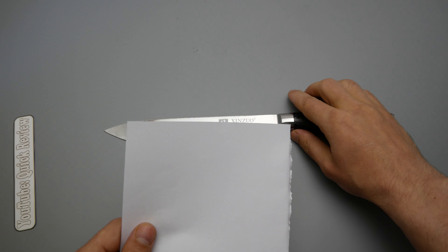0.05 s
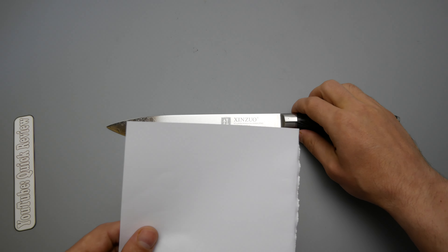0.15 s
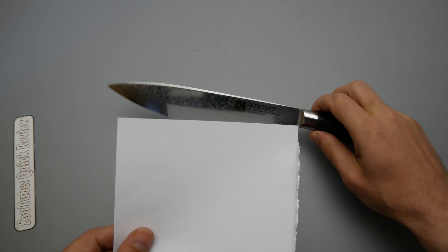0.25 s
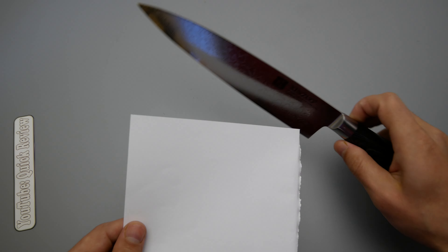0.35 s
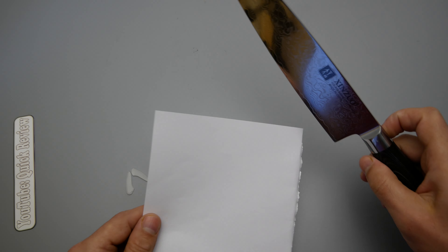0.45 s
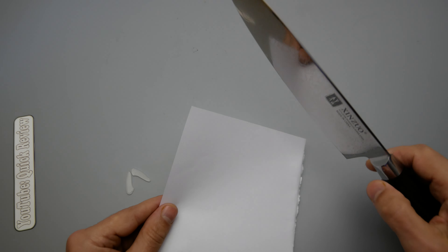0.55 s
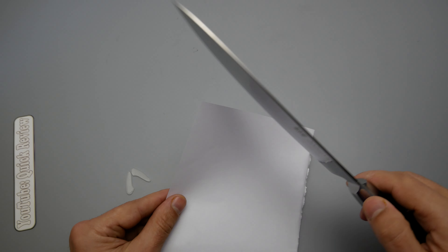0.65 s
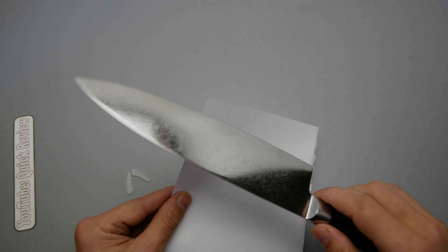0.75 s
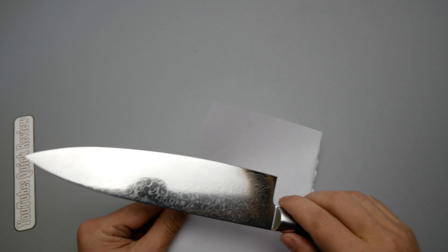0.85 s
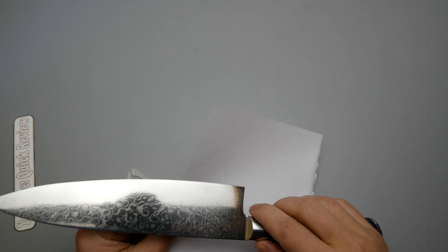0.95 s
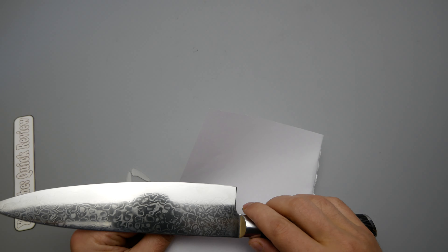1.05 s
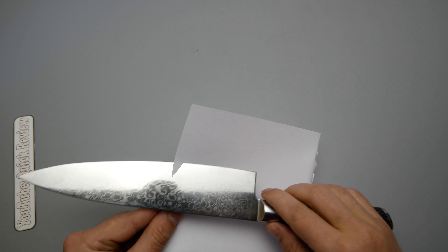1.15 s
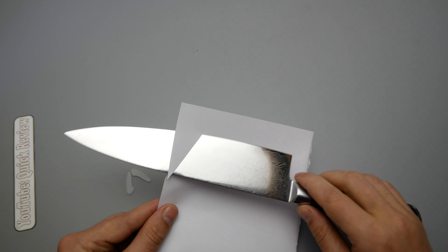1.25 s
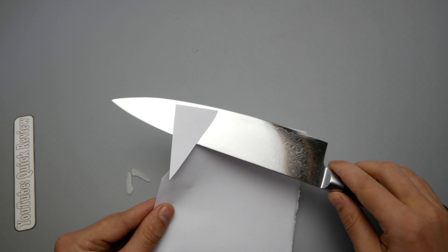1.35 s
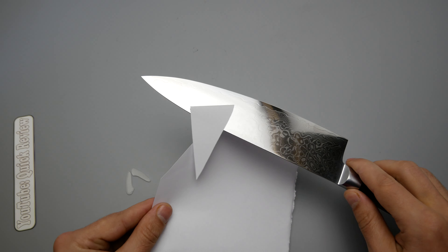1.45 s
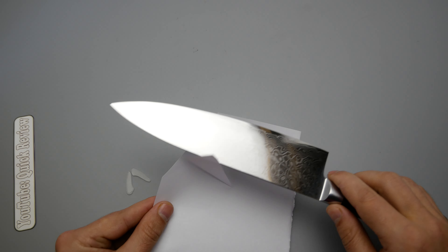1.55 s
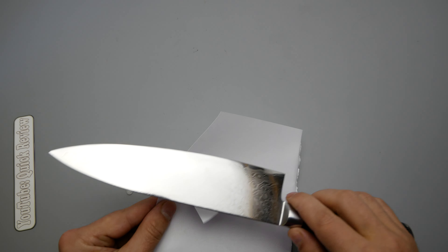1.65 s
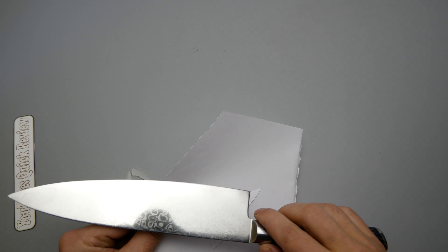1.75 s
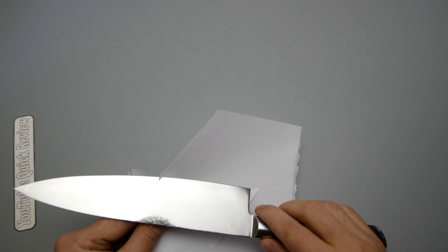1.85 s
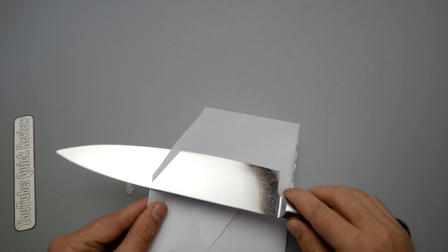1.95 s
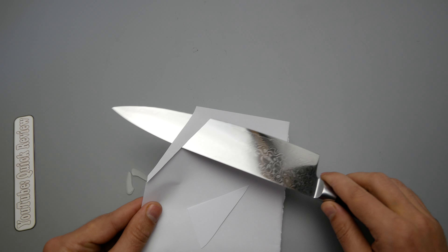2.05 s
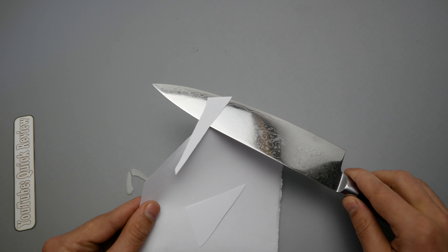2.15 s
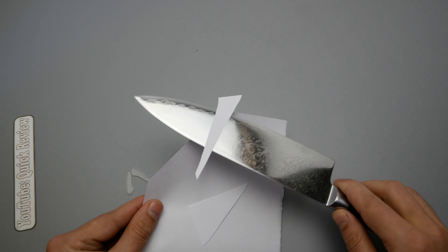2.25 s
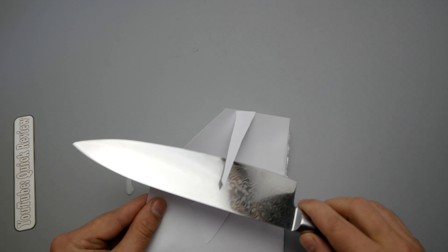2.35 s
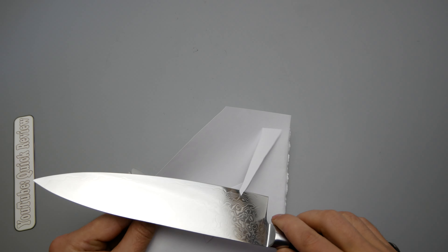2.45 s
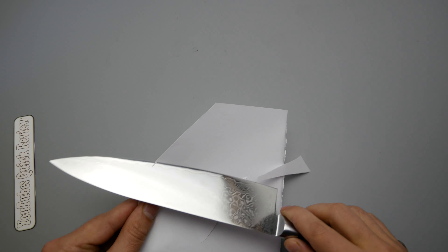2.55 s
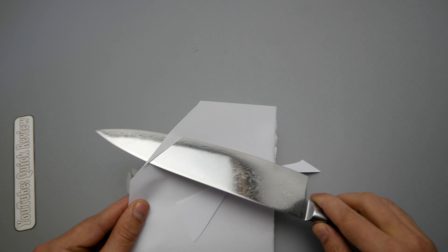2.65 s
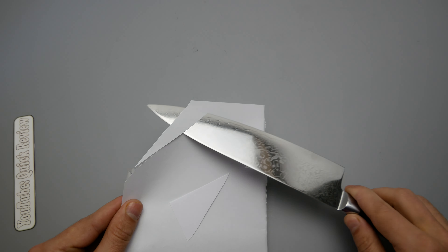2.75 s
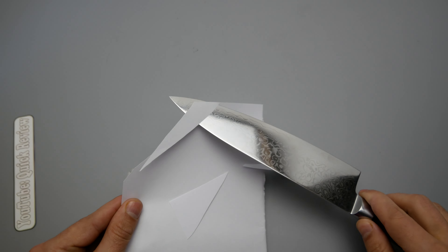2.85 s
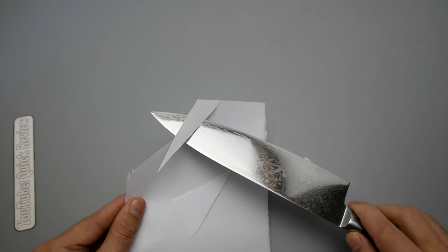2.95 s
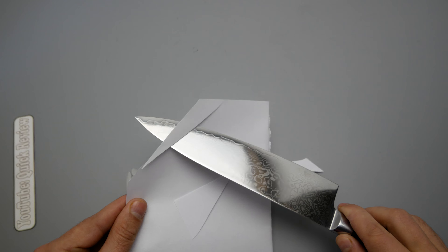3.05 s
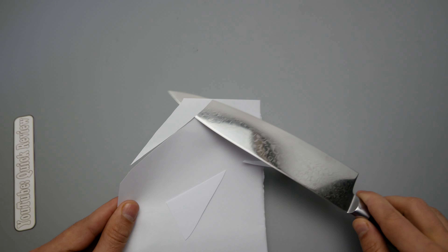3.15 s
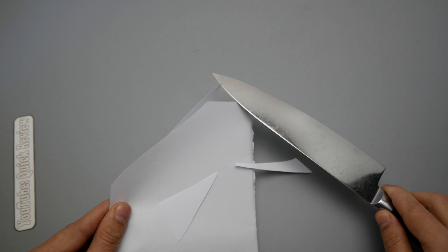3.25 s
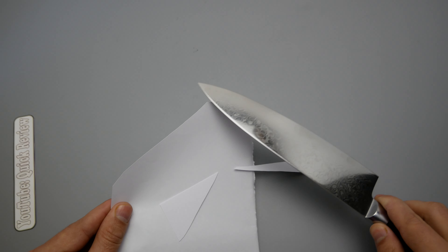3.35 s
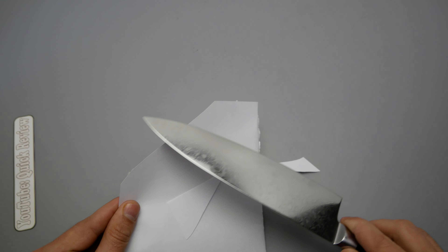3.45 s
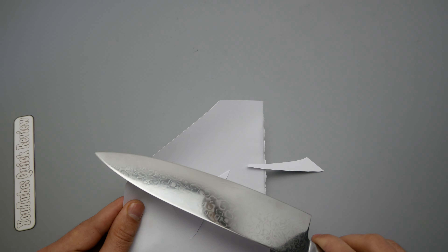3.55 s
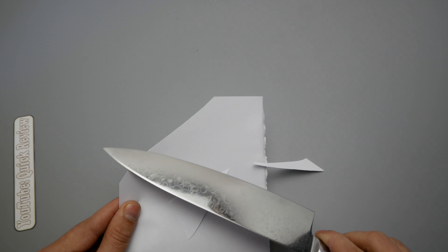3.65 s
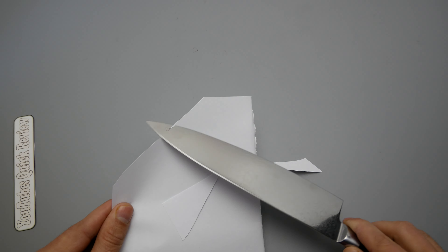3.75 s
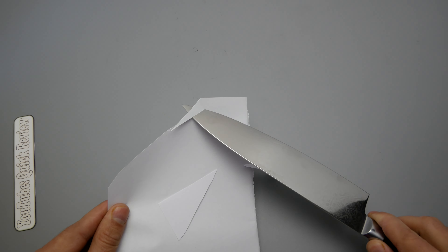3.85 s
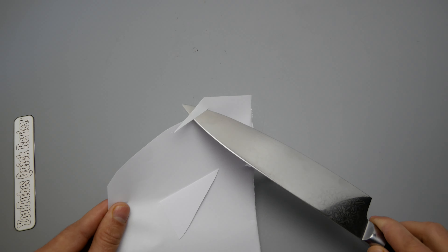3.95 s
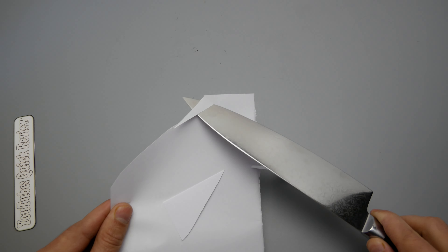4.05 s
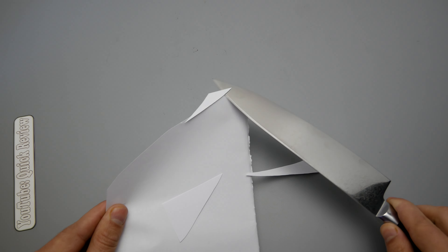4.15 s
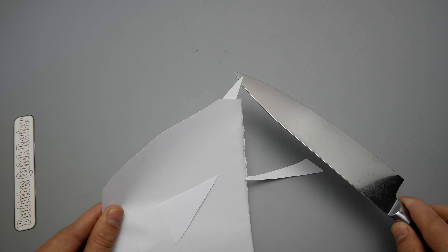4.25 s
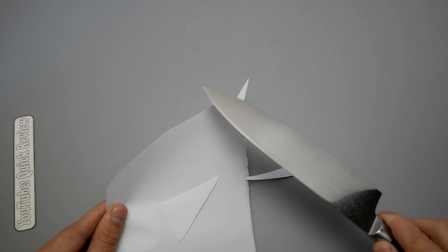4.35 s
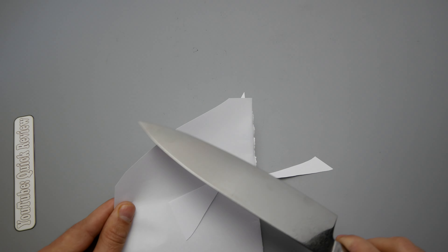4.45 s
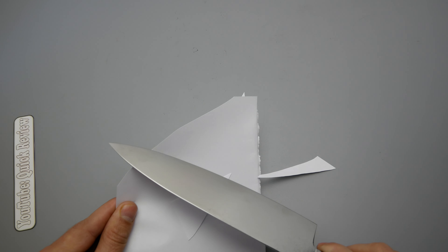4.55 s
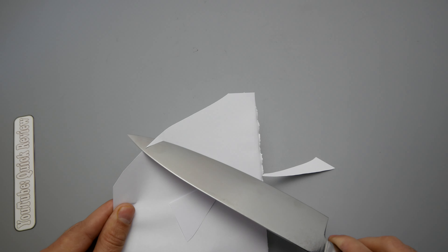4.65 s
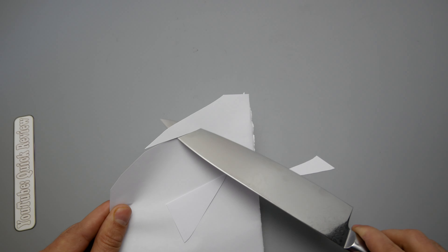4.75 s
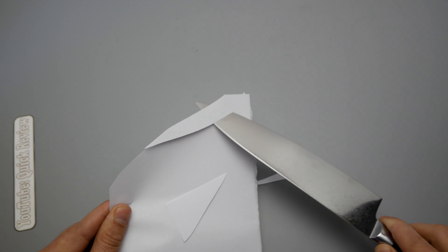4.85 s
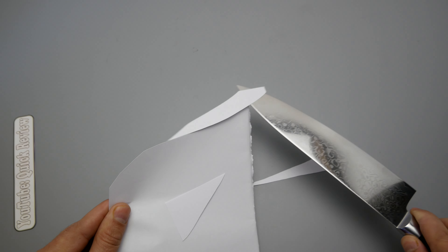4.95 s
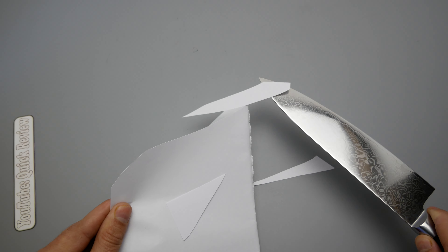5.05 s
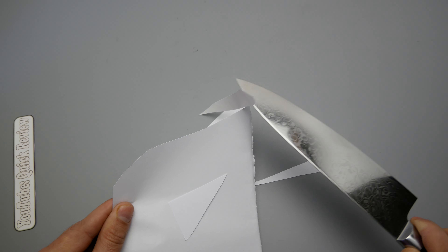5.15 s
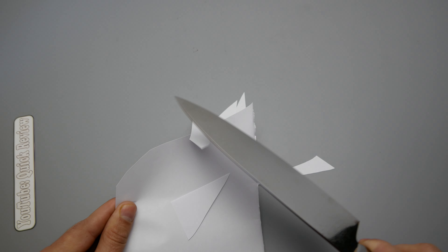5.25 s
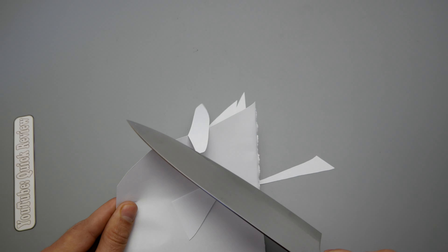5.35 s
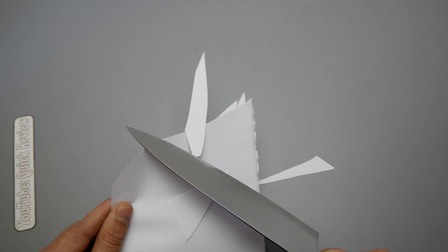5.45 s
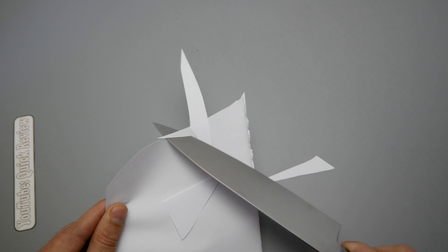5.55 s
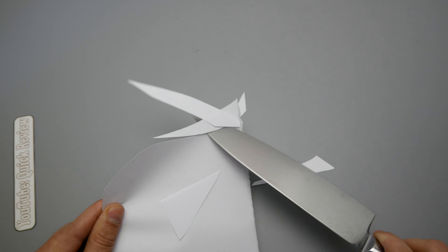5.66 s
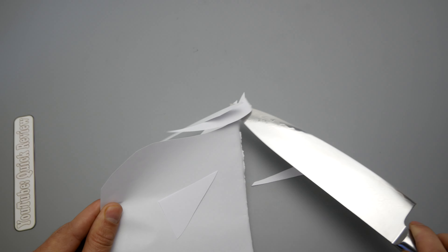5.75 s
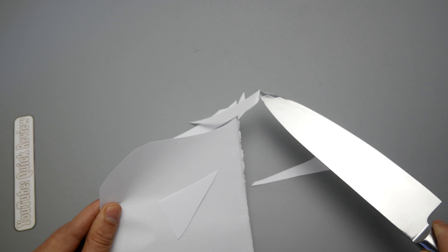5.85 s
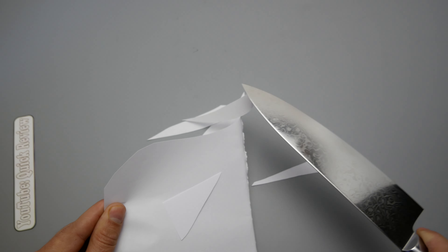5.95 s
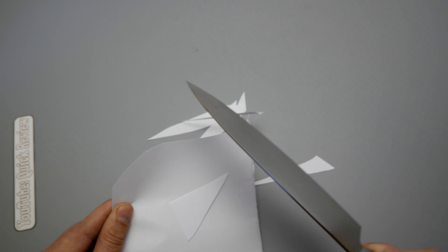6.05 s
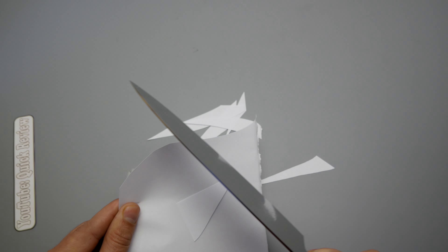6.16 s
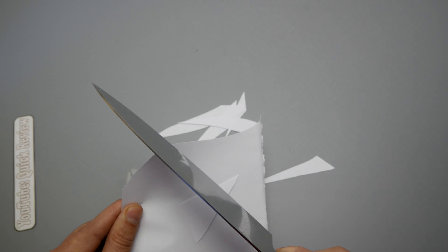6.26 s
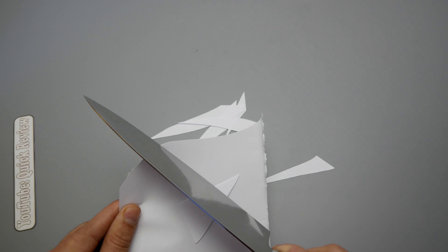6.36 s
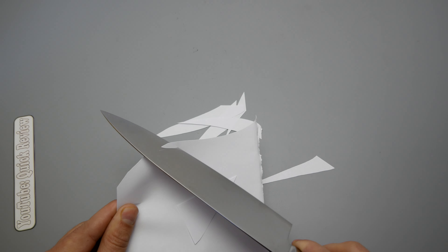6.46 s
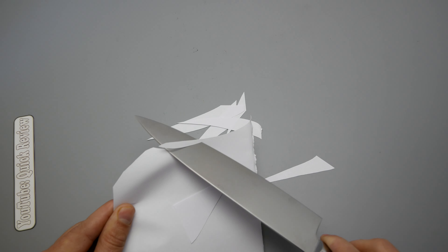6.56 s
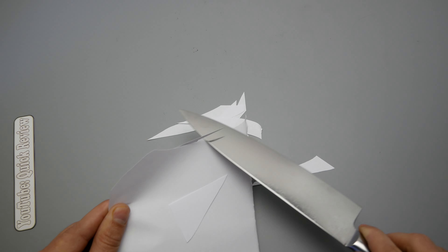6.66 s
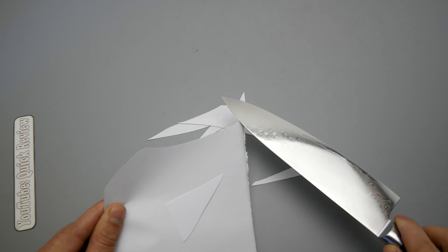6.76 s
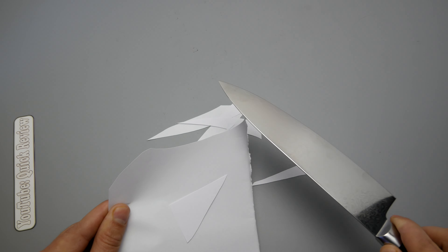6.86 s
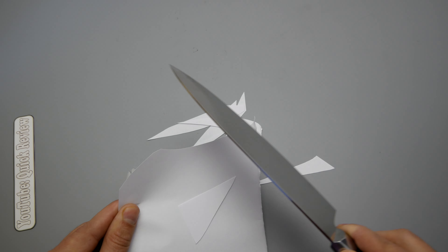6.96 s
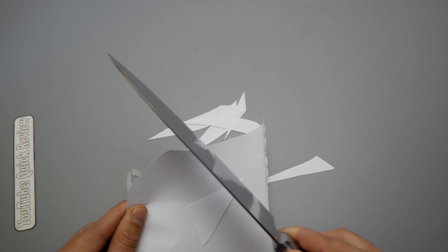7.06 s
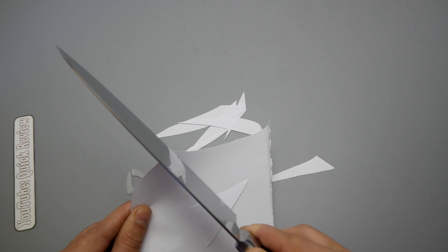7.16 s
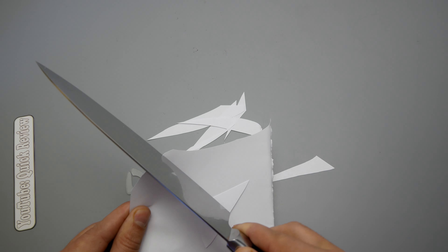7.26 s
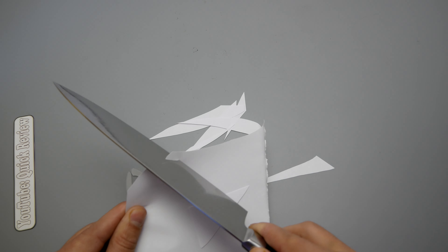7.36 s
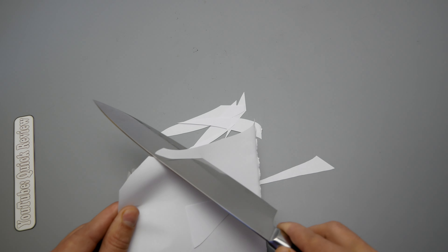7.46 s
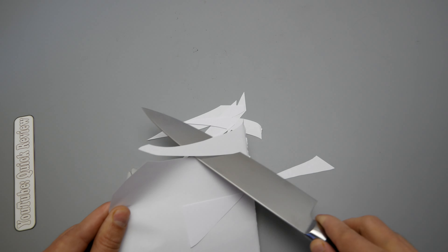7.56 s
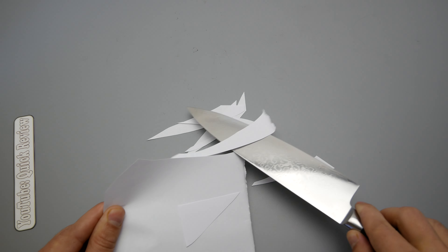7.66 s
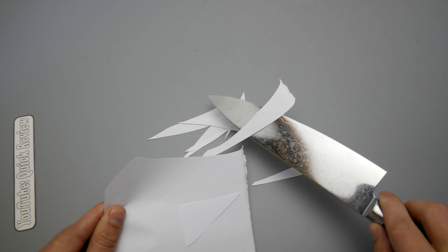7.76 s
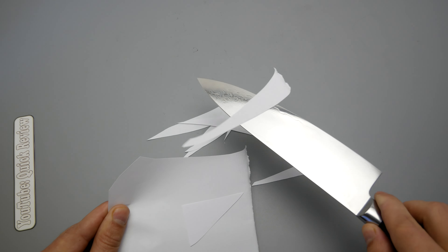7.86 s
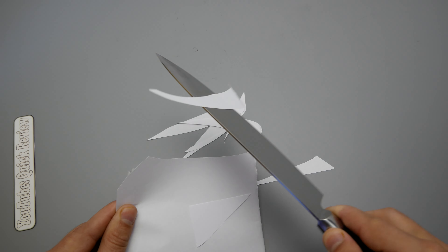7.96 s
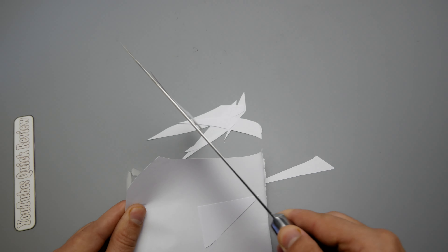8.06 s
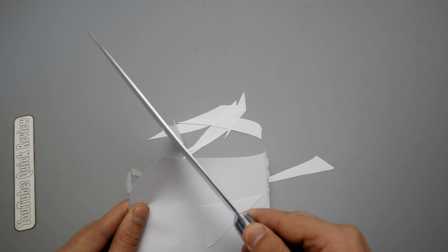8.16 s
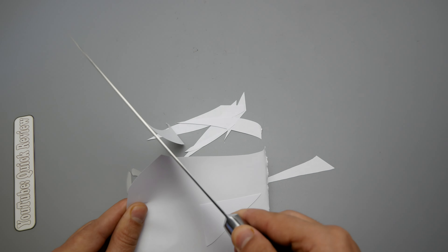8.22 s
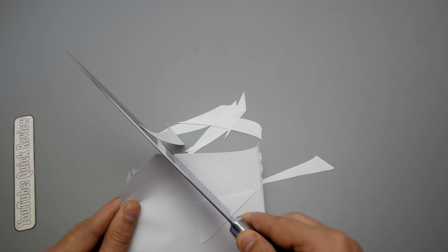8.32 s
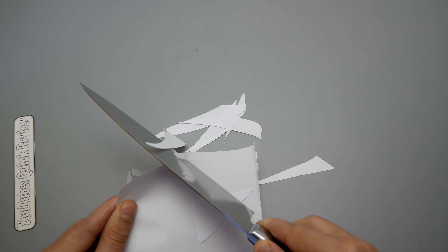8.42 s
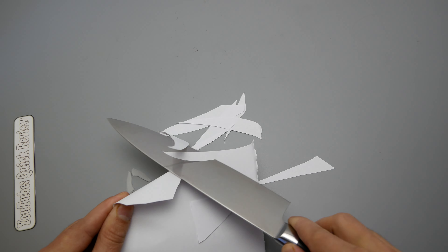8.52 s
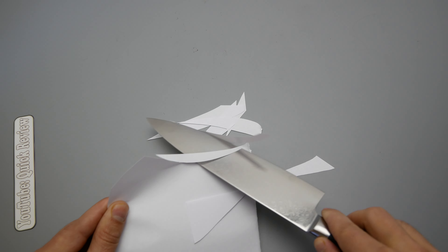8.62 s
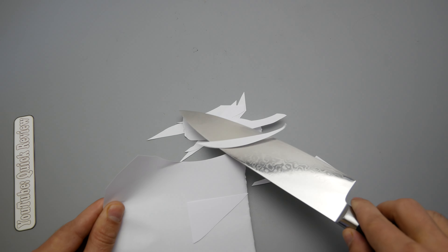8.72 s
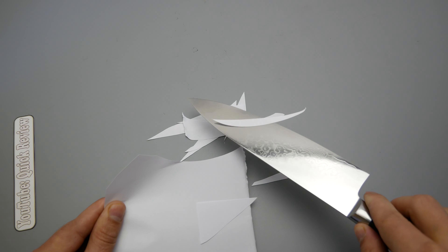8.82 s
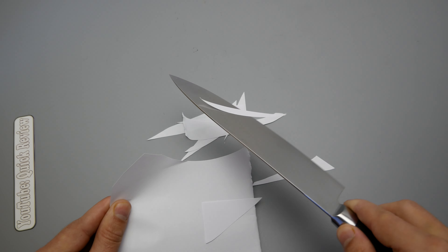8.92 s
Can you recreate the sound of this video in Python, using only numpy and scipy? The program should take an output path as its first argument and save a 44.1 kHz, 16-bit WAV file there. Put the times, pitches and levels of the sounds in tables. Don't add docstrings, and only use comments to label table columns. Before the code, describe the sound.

Close up in a small quiet room, a sheet of paper slides softly through fingers and flicks once, then a sharp knife makes ten separate cuts. Each is a short, gritty, bright tearing swish, followed by rustles, flicks and dull taps of the shaken sheet. The blade sometimes sings very faintly afterward. The last cut is longest and bites hardest. A low motor hum and soft room noise stay underneath.

```python
import sys
import numpy as np
from scipy import signal
from scipy.fft import rfft, irfft, next_fast_len
from scipy.io import wavfile
from scipy.ndimage import uniform_filter1d

SR = 44100
rng = np.random.default_rng(int(sys.argv[2]) if len(sys.argv) > 2 else 0)


def to_wav(sig):
    pcm = np.clip(np.atleast_2d(sig), -1, 1) * 32767
    pcm = np.round(pcm).astype(np.int16)
    wavfile.write(sys.argv[1], SR, pcm.T)


def volts_from_decibels(level):
    exponent = np.asarray(level, float) / 20
    return 10 ** exponent


N = 396459

ZONES_HZ = [1200, 3100, 5300, 9200]


def rms_one(x):
    return x / np.sqrt(np.mean(x ** 2) + 1e-20)


def at_hz(points, hz):
    table_hz, values = np.array(points).T[:2]
    return np.interp(np.log(hz), np.log(table_hz), values)


def band(x, low_hz, high_hz):
    return signal.sosfilt(signal.butter(2, [low_hz, high_hz], "band", fs=SR, output="sos"), x)


def drift(rate_hz):
    r = np.exp(-80 * np.pi * rate_hz / SR)
    white = rng.standard_normal(N // 40 + 2002)
    slow = signal.lfilter([1], [1, -2 * r, r * r], white)[2000:]
    return np.interp(np.arange(N) / 40, np.arange(len(slow)), rms_one(slow))


def resonance(x, hz, width_hz):
    r = np.exp(-np.pi * width_hz / SR)
    poles = [1, -2 * r * np.cos(2 * np.pi * hz / SR), r * r]
    return signal.lfilter([(1 - r * r) / 2, 0, (r * r - 1) / 2], poles, x)


def hum():
    # (frequency [Hz], width [Hz], level [dB])
    overtones = [(118, 2.2, -62.5), (262, 23, -72), (365.3, 6.6, -66.5), (467, 6, -67), (545.3, 5.5, -66),
                 (698, 18, -93)]
    t = np.arange(N) / SR
    gain = volts_from_decibels(-64.5 + 2.5 * drift(8))
    tone = gain * np.sin(2 * np.pi * 119.5 * t + .5 * drift(4) + [[0], [1.3]])
    white = rng.standard_normal((2, N))
    return tone + sum(volts_from_decibels(db) * rms_one(resonance(white, hz, width)) for hz, width, db in overtones)


def air():
    # (frequency [Hz], density [dB per Hz])
    air_colour = [(12, -66), (20, -27), (84, -32), (100, -17.5), (124, -7.5), (174, -10), (278, -8.5),
                  (540, -12.5), (620, -27), (693, -11.5), (1460, -20), (2340, -24), (2930, -25.5),
                  (9900, -43), (15000, -52)]
    # (time [s], level [dB])
    air_level = [(0.0, -57.5), (4.7, -54), (8.99, -54.5)]
    # (frequency [Hz], likeness [1])
    air_likeness = [(60, 1), (180, -0.41), (540, -0.42), (1630, -0.14), (4910, 1), (14800, 0.56)]
    out = 0
    edges = 20 * 2 ** np.arange(0, 9.6, .5)
    white = rng.standard_normal((2, 2, N))
    for k, (low, high) in enumerate(zip(edges, edges[1:])):
        mid, side = band(white[k % 2], low, high)
        hz = np.sqrt(low * high)
        alike = np.clip(at_hz(air_likeness, hz), -.95, .95)
        gain = volts_from_decibels(at_hz(air_colour, hz) + 1.3 * drift(4))
        out = out + gain * (np.sqrt(1 + alike) * mid + np.sqrt(1 - alike) * side * [[1], [-1]])
    s, level_db = np.transpose(air_level)
    return volts_from_decibels(np.interp(np.arange(N) / SR, s, level_db + 1.5)) * rms_one(out)


def stir(body_power):
    doubling_db, felt_s = -24.5, 0.23
    return np.sqrt(1 + uniform_filter1d(body_power, round(felt_s * SR)) / volts_from_decibels(doubling_db) ** 2)


def blade():
    # (time [s], level above the usual ring [dB])
    releases = [
        (1.46, -2),
        (2.21, 2),
        (2.94, -8),
        (4.23, 0),
        (5.03, -3),
        (5.85, -6),
        (7.71, 1),
    ]
    blade_hz, t60_s, ring_db = 2261, .85, -57
    t = np.arange(N) / SR
    fall = sum(volts_from_decibels(db - 60 * np.maximum(t - s, 0) / t60_s) * (t > s) for s, db in releases)
    return volts_from_decibels(ring_db) * fall * np.sin(2 * np.pi * blade_hz * t)


def flicks():
    # (time [s], peak [dB], body pitch [Hz], crack above peak [dB], fall by 60 dB [s])
    tap_rows = [(1.489, -17.5, 980, -26, 0.051), (1.699, -22.5, 1480, -11.5, 0.098),
                (2.249, -14.5, 724, -27, 0.029), (3.341, -8, 806, -25, 0.047), (4.648, -28, 900, -23, 0.06),
                (5.346, -19, 750, -14, .05), (5.383, -26, 1250, -24, .067), (5.418, -25, 1370, -14, 0.16),
                (6.455, -12, 1420, -13, 0.032), (8.401, -7, 1380, -12, 0.02), (8.45, -6.5, 1730, -29, .1)]
    # (time [s], peak [dB], body pitch [Hz], crack above peak [dB],
    # fall by 60 dB [s])
    flick_rows = [(0.364, -27.5, 740, -18, 0.047), (1.673, -19, 1570, -6.5, 0.049),
                  (1.729, -30, 865, -9, 0.067), (3.246, -14.5, 1190, -1, 0.047),
                  (3.284, -16.5, 1040, -25, 0.075), (3.295, -10, 1400, -21, 0.046),
                  (3.681, -30.5, 657, -23, 0.087), (4.125, -11.5, 700, -13, 0.054),
                  (4.247, -21.5, 1000, -12, 0.11), (5.459, -22.5, 1490, -17, .05),
                  (5.515, -24.5, 1460, -13, 0.15), (5.856, -21, 1970, -12, .069),
                  (5.92, -23.5, 1730, -2, 0.047), (6.419, -20.5, 1600, -12.5, 0.088),
                  (6.739, -8.5, 760, -1, 0.049), (7.374, -7.5, 1250, -12, 0.045),
                  (8.189, -20, 1660, -10.5, .038)]
    # (time [s], peak [dB])
    tick_rows = [
        (3.447, -34.5),
        (6.2023, -38),
        (6.2234, -40),
    ]
    tap_puff_db, flick_puff_db = -15, -9.5
    puff_follows = 0.72
    t = np.arange(round(.15 * SR)) / SR
    rows = []
    for table, usual_puff_db in ((tap_rows, tap_puff_db), (flick_rows, flick_puff_db)):
        for s, peak_db, hz, bright_db, t60 in table:
            puff_db = usual_puff_db + (puff_follows - 1) * (peak_db + 20)
            rows.append((s, peak_db, hz, bright_db, puff_db, t60))
    rows += [(s, db - 12.0, 1500, 18, -20, .045) for s, db in tick_rows]

    out = np.zeros(N)
    noise = rng.standard_normal((len(rows), 3, len(t)))
    for (s, peak_db, hz, bright_db, puff_db, t60), (knock, crack, puff) in zip(rows, noise):
        fall = volts_from_decibels(-60 * t / max(t60, .005)) * (1 - np.exp(-t / 0.00062))
        burst = rms_one(band(knock, hz / 1.42, hz * 1.87)) * fall
        sharp = volts_from_decibels(min(.6 * bright_db, -3))
        top = band(band(crack, 7500, 11500), 6000, 12000)
        burst += volts_from_decibels(bright_db) * rms_one(band(crack, 2200, 6500) + sharp * top) * fall ** 1.1
        burst += volts_from_decibels(puff_db) * rms_one(band(puff, 150, 420)) * fall ** .6
        at = round(s * SR)
        out[at:at + len(t)] += (volts_from_decibels(peak_db - 11.5) * burst)[:N - at]
    return out


def touches():
    # (peak time [s], rise [s], fall [s], tearing level [dB],
    # sheet body above it [dB])
    slides = [(0.03, 0.11, 0.16, -63, 8), (0.18, 0.053, .2, -50.5, 0.5), (0.43, 0.39, 0.18, -53.5, -2),
              (0.598, 0.067, 0.24, -48.5, 1.5), (0.7, 0.11, 0.051, -58, 4),
              (1.601, 0.006, 0.062, -48.5, -6), (1.818, 0.0064, 0.043, -54.5, 3),
              (2.454, 0.034, .045, -57.5, 2.5), (2.59, .11, 0.045, -51, -0.5),
              (3.102, .017, 0.016, -60, -20), (3.235, .095, 0.033, -49, 0.5), (3.69, 0.018, 0.036, -53, 11),
              (4.106, .036, 0.033, -55.5, -6), (4.52, 0.056, 0.04, -64, -4),
              (5.2, 0.027, 0.042, -62.5, -31), (5.3, .03, 0.021, -49.5, -3), (6.0, 0.084, 0.1, -59, 2),
              (6.128, 0.1, 0.022, -57.5, 0)]
    # (peak time [s], rise [s], fall [s], tearing level [dB],
    # sheet body above it [dB])
    rustles = [(1.5, .01, 0.073, -56, 8), (1.68, 0.011, 0.26, -59, 10), (2.26, .01, .06, -58, -1),
               (3.336, 0.039, 0.047, -45, 9.5), (4.25, .01, 0.053, -50, 16), (5.09, 0.075, 0.081, -50.5, 7),
               (5.16, 0.052, 0.044, -58.5, 7.5), (5.359, 0.022, 0.058, -51, 7),
               (5.49, 0.15, 0.071, -49.5, 7), (5.87, 0.022, .09, -50.5, 4), (6.785, 0.034, 0.089, -45, 0),
               (7.715, .015, 0.086, -52.5, 0), (8.805, .015, 0.078, -49.5, 1)]
    upper_db, hiss_db, hiss_loss_per_body_db, swell_power = -4.5, -5.5, .5, 1.18
    t, power = np.arange(N) / SR, 0
    for s, rise_s, fall_s, db, body_db in [*slides, *rustles]:
        swell = np.clip(np.minimum(1 + (t - s) / rise_s, 1 - (t - s) / fall_s), 0, 1) ** swell_power
        zones_db = [body_db, 0, upper_db, hiss_db - hiss_loss_per_body_db * body_db]
        power = power + np.outer(volts_from_decibels(db + np.array(zones_db)), swell) ** 2
    return power


def cuts():
    # (start [s], length [s], attack [s], tearing level [dB],
    # bite as the edge enters and bends the sheet [dB])
    cut_rows = [
        (1.175, 0.26, 0.0079, -34.5, 5.5),
        (1.916, .262, 0.015, -33.5, 1.5),
        (2.58, 0.31, 0.044, -32.5, 3),
        (3.712, .24, 0.018, -36, 3),
        (4.123, 0.091, .006, -34, 9.5),
        (4.653, .36, 0.04, -31.5, 4),
        (5.518, 0.308, 0.053, -32.5, 9),
        (6.428, 0.282, 0.047, -32, 13.5),
        (7.325, 0.3694, 0.055, -32, 13),
        (8.392, 0.38, 0.014, -32, 18),
    ]
    # (upper tearing [dB], edge hiss [dB],
    # shake of the loosening strip [dB], release [s])
    edge_rows = [
        (-4.5, -8, 3, 0.023),
        (-4, -4, 2, 0.026),
        (-4.5, -4, 3, 0.053),
        (-4, -3.5, 5, 0.051),
        (4, -2, 2, .008),
        (-4, -3.5, 1, 0.01),
        (-2.5, 0.5, -1, 0.029),
        (-5, 0.5, 4.5, 0.031),
        (-5, -2.5, -3, 0.014),
        (-3, -2, 7, 0.028),
    ]
    # (time [s], half length [s], level [dB], favoured pitch [Hz])
    pushes = [(1.194, 0.041, 1.5, 5300), (1.99, 0.043, 5.5, 9000), (1.346, 0.087, 4, 3300),
              (1.434, 0.021, 4, 700), (2.122, 0.031, 6.5, 3100), (2.654, 0.019, 5.5, 1200),
              (2.803, 0.04, 11, 2020), (3.864, 0.07, 6, 1000), (3.872, 0.087, 13.5, 5000),
              (4.19, 0.045, 2.5, 5300), (4.702, 0.064, 4, 900), (4.777, 0.081, 4.5, 9400),
              (4.925, 0.032, 4, 1200), (4.824, 0.033, 4.5, 2800), (4.893, 0.033, 5, 3300),
              (5.774, 0.023, 9, 1890), (5.816, 0.022, 2, 9350), (6.494, 0.037, 3, 1900),
              (6.69, .04, 3.5, 2020), (7.39, 0.035, 5, 1900), (7.5, 0.068, 9.5, 1310),
              (7.571, 0.05, 6.5, 5300), (7.684, 0.01, 11, 9450), (8.448, .04, 1, 1800),
              (8.61, 0.064, 3, 4300), (8.68, 0.031, 1, 5500), (8.72, 0.035, 4.5, 2420)]
    push_octaves = 0.89
    body_db = -6
    entry_db, entry_lags = -17.5, [.7, 1.0, 1.2, 1.5]
    bite_hold_s, bite_fade_db_per_s = 0.0067, 119
    bite_shares = [1.0, 0.3, 0.18, -0.033]
    exit_s, release_db = 0.093, [15.5, 26, 22, 23]

    t, power = np.arange(N) / SR, np.full((4, N), 1e-14)
    push_db = 0
    for s, half_s, db, hz in pushes:
        reach = np.exp(-(np.log2(np.array(ZONES_HZ) / hz) / push_octaves) ** 2)
        push_db = push_db + db * np.outer(reach, np.clip(1 - ((t - s) / half_s) ** 2, 0, 1))

    for (s, length_s, attack_s, db, bite_db), edge in zip(cut_rows, edge_rows):
        upper_db, hiss_db, exit_db, release_s = edge
        i = slice(round(s * SR), round((s + length_s + .2) * SR))
        age = t[i] - s
        level_db = db + np.array([[body_db], [0], [upper_db], [hiss_db]]) + push_db[:, i]
        level_db += np.outer(entry_lags, entry_db * np.clip(1 - age / attack_s, 0, 1))
        bite_top = bite_db * np.minimum(.5 + age / attack_s, 1)
        bite_fall = bite_db - bite_fade_db_per_s * (age - attack_s - bite_hold_s)
        level_db += np.outer(bite_shares, np.clip(bite_fall, 0, bite_top))
        level_db[0] += exit_db * np.clip(1 + (age - length_s) / exit_s, 0, 1)
        level_db -= np.outer(release_db, np.maximum(age - length_s, 0) / release_s)
        power[:, i] += volts_from_decibels(level_db) ** 2
    return power


def snaps(per_s, spread_db):
    sizes = volts_from_decibels(spread_db * np.minimum(rng.exponential(1, N), 5)) * rng.choice([-1, 1], N)
    return rms_one(sizes * (rng.random(N) < per_s / SR) + 1e-18)


def paper(power, per_s, spread_db, patchy_db, judder_db):
    # (frequency [Hz], density [dB per Hz])
    tear_colour = [(88, -58), (150, -27.5), (278, -11), (416, -18.5), (649, -9), (991, -1.5), (1180, -1),
                   (1510, -2.5), (1730, -4.5), (2020, -1), (5300, -4), (7940, -18.5), (10800, -21),
                   (13900, -46), (15000, -66.5)]
    zone_tops_hz = [2200, 4400, 6500]
    trains = [snaps(per_s, spread_db), snaps(per_s, spread_db)]
    edges = 160 * 2 ** (np.arange(40) / 6)
    centres = np.sqrt(edges[1:] * edges[:-1])
    usual = volts_from_decibels(at_hz(tear_colour, centres)) * np.sqrt(centres)
    zone_power = np.bincount(np.searchsorted(zone_tops_hz, centres), usual ** 2)
    effort_db = 10 * np.log10(power / zone_power[:, None])
    place = np.interp(np.log(centres), np.log(ZONES_HZ), np.arange(4))
    out = 0
    for k, (low, high) in enumerate(zip(edges, edges[1:])):
        below = min(int(place[k]), 2)
        share = place[k] - below
        gain_db = (1 - share) * effort_db[below] + share * effort_db[below + 1]
        gain_db = gain_db + patchy_db * drift(15.6)
        out = out + usual[k] * volts_from_decibels(gain_db) * rms_one(band(trains[k % 2], low, high))
    return volts_from_decibels(judder_db * drift(18.0) - 1.0) * out


def body(x):
    # (frequency [Hz], width [Hz], level [dB])
    peaks = [(672.5, 107, 8), (857, 41, -17), (891, 11.3, 6.5), (1019, 45, -19), (1140, 60, 4.5),
             (1203, 25, 7), (1355, 13, -10), (1505, 37.5, 11), (1660, 17, 3.5), (1793, 123, -4),
             (1830, 25, 8), (2014, 102, 4.5), (2604, 20, -10), (2945, 22, 6.5), (3154, 25, 8.5),
             (3416, 70, 8), (3672, 47, 6), (3985, 36, 8.5), (4090, 46, 5.5), (4344, 81, 8), (5196, 90, 8),
             (5470, 40, 6.5), (6130, 56, 6.5), (7230, 73, 2), (9500, 500, 1), (10360, 86, 6.5),
             (11300, 120, -10)]
    for hz, width, db in peaks:
        x = x + (volts_from_decibels(db) - 1) * resonance(x, hz, width)
    return volts_from_decibels(-2) * x


def near(x):
    # (left delay [s], right delay [s], level [dB])
    near_echoes = [(.00031, .00043, -24), (.0011, 0.0021, -28), (.0023, .0029, -53)]
    lean = .12 * resonance(x, 1500, 1100) - .12 * resonance(x, 600, 400)
    out = x + lean * np.array([[-1], [1]])
    for *delays, db in near_echoes:
        out += volts_from_decibels(db) * np.array([np.roll(x, round(s * SR)) for s in delays])
    return out


def room(x):
    t60_s, wall_cut_hz = 0.24, 5700
    size = next_fast_len(N + SR)
    w = 2 * np.pi * np.fft.rfftfreq(size)
    dull = 1 / (1 + 1j * w * SR / (2 * np.pi * wall_cut_hz))
    echoes = np.zeros((2, len(w)), complex)
    for k, lag in enumerate(rng.uniform(.004, .03, 20) * SR):
        lag_s = lag / SR
        turn = volts_from_decibels(-60 * lag_s / t60_s) * dull ** (lag_s / 0.053) * np.exp(-1j * w * lag)
        echoes[k % 2] += (-1) ** (k // 2) * turn / (1 - turn)
    return irfft(rfft(x, size) * echoes, size)[:, :N]


def scene():
    power = cuts() + touches()
    fibres = paper(power, per_s=9000, spread_db=3.5, patchy_db=3.0, judder_db=1.2)
    sheet = body(fibres + flicks())
    knife_and_paper = near(sheet) + volts_from_decibels(-18) * room(sheet) + blade()
    return knife_and_paper + stir(power[0]) * air() + hum()


def top_cut(x):
    return signal.sosfilt(signal.butter(12, 15360, fs=SR, output="sos"), x)


def record(dry):
    dry = dry - 0.55 * resonance(dry, 7880, 230)
    dry = signal.sosfilt(signal.butter(4, 12000, fs=SR, output="sos"), dry)
    return top_cut(dry)


dry = scene()
out = record(dry)
to_wav(out)
```